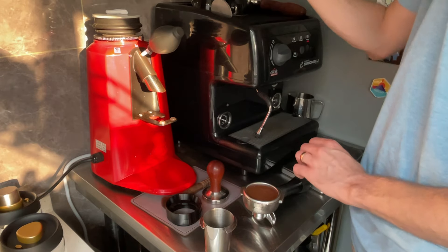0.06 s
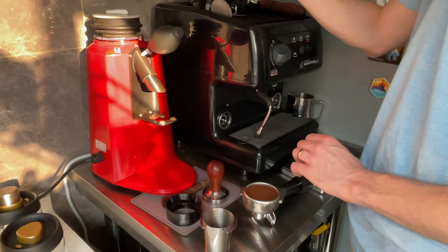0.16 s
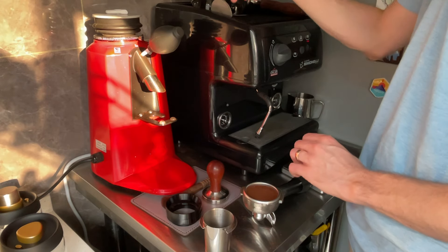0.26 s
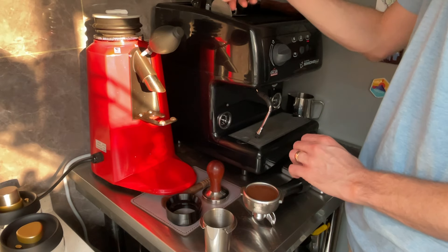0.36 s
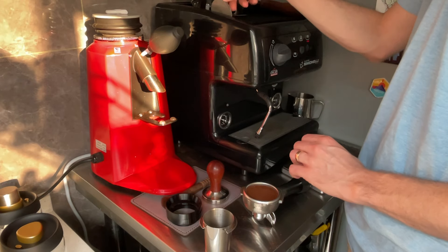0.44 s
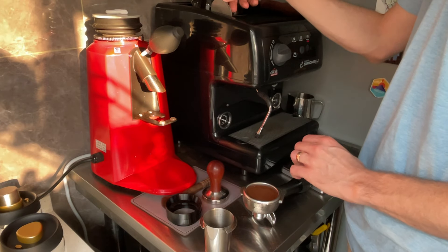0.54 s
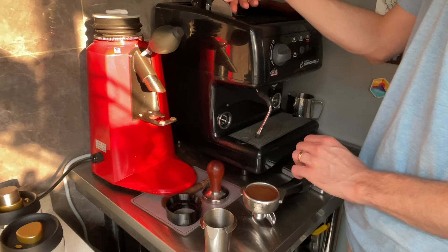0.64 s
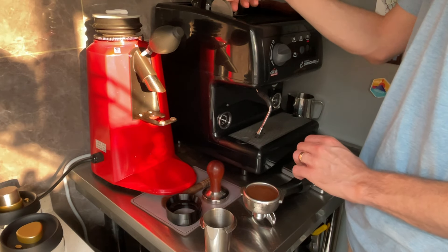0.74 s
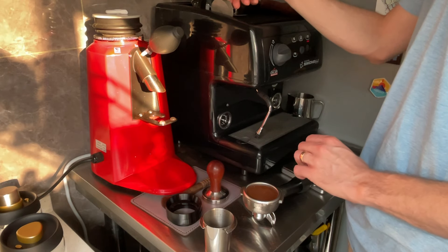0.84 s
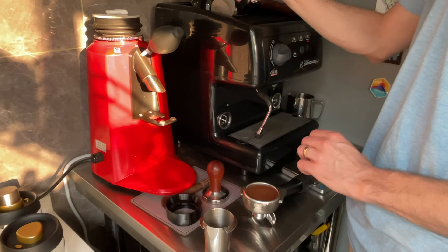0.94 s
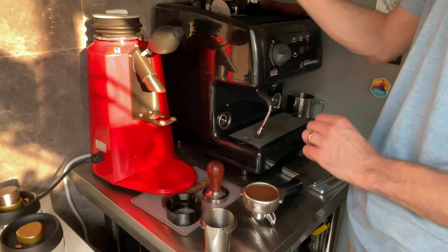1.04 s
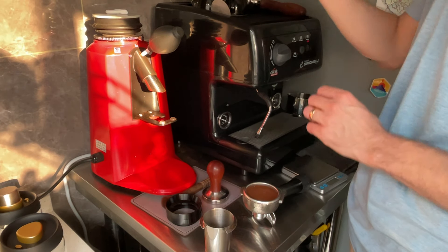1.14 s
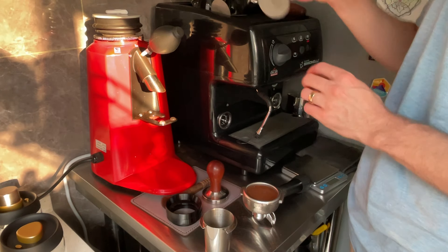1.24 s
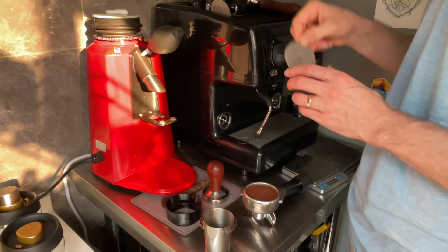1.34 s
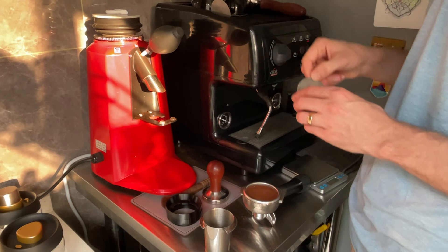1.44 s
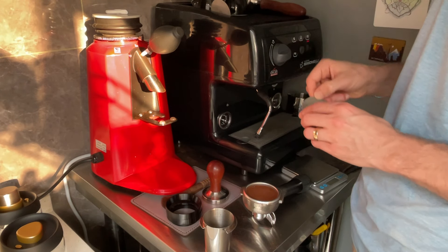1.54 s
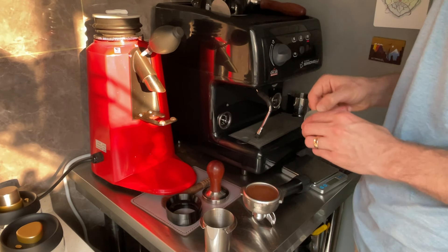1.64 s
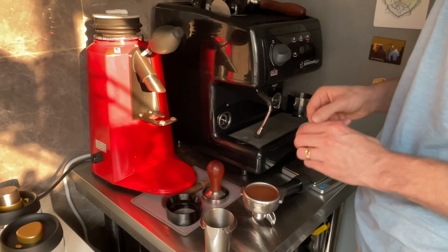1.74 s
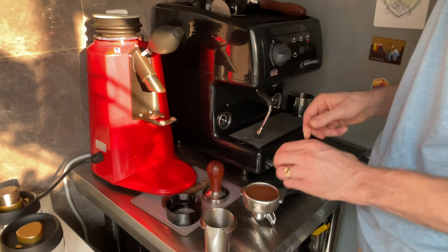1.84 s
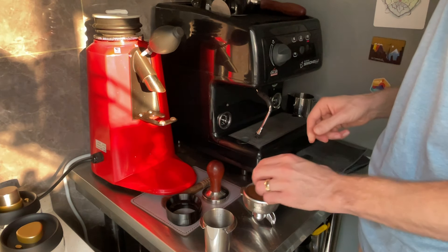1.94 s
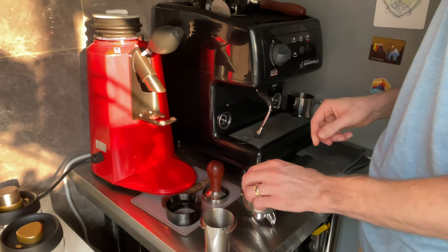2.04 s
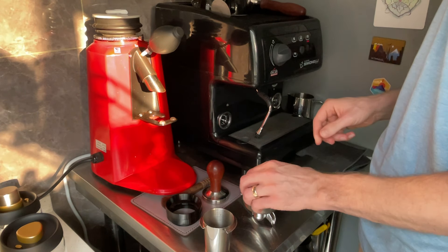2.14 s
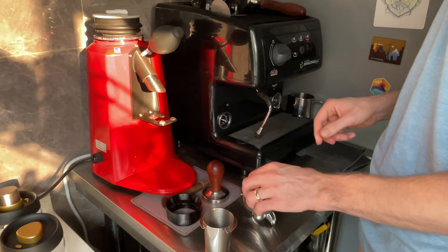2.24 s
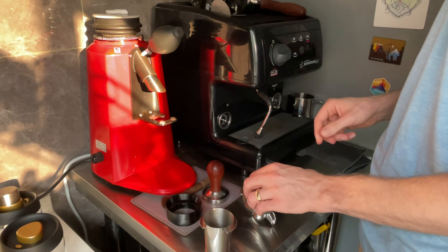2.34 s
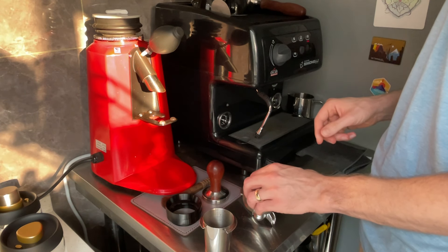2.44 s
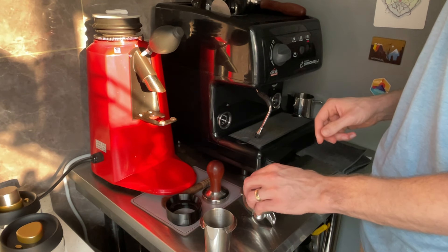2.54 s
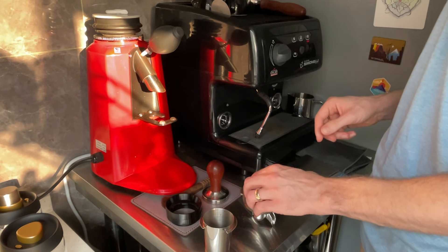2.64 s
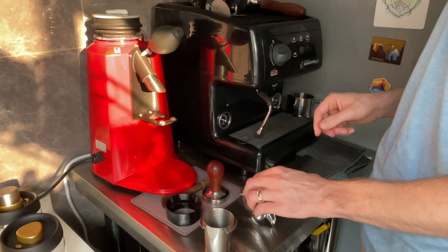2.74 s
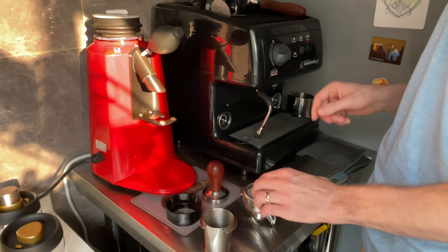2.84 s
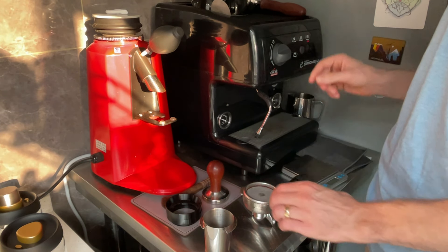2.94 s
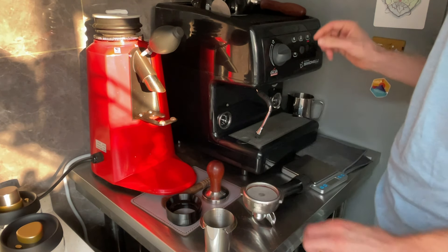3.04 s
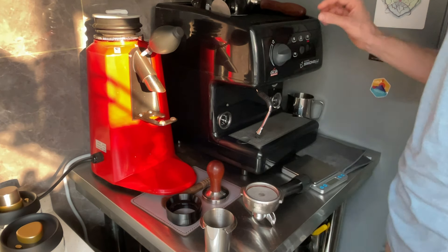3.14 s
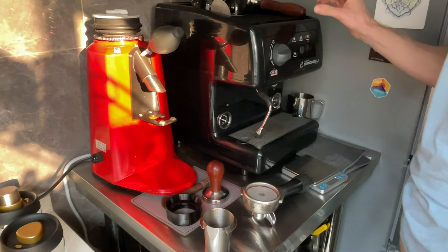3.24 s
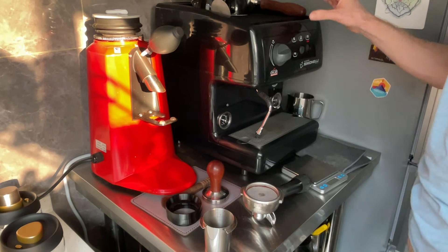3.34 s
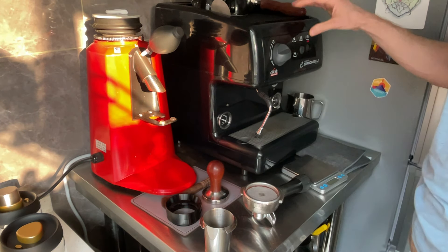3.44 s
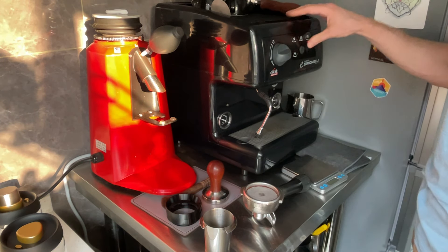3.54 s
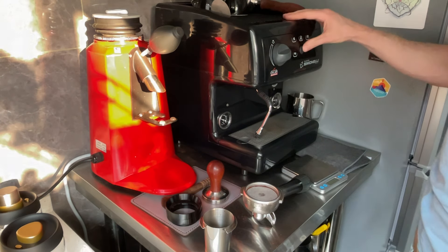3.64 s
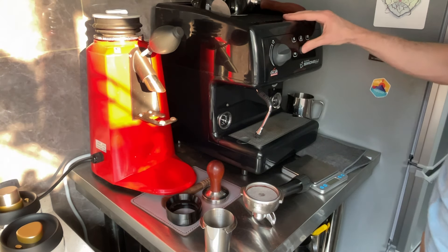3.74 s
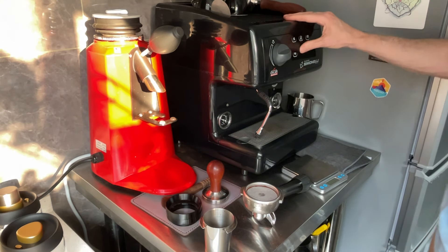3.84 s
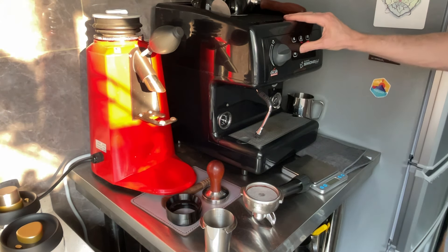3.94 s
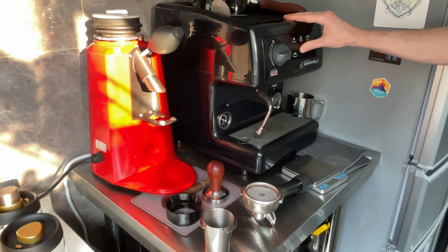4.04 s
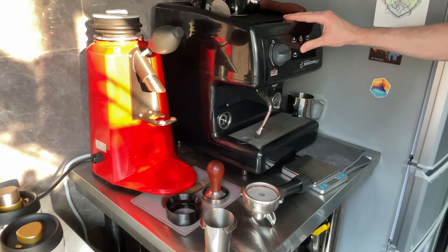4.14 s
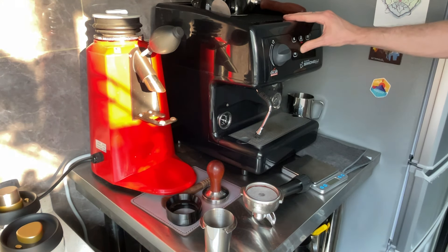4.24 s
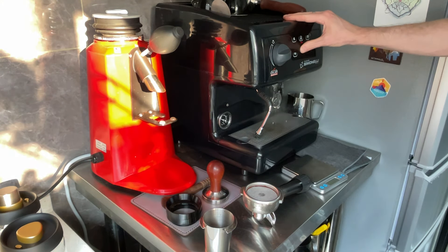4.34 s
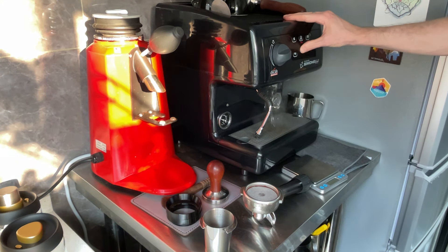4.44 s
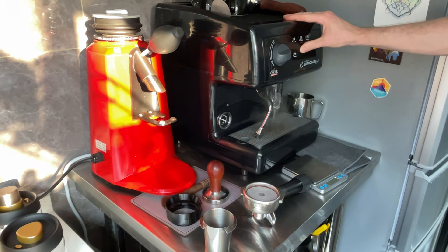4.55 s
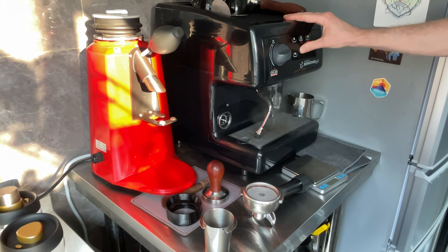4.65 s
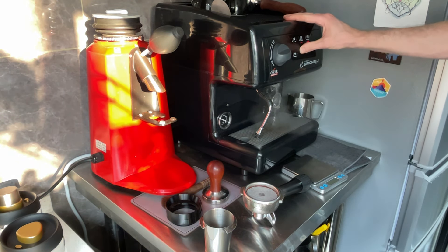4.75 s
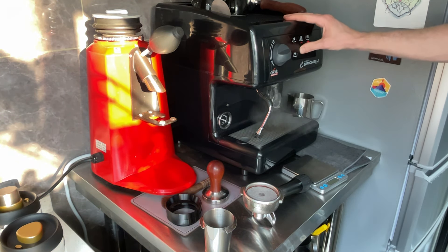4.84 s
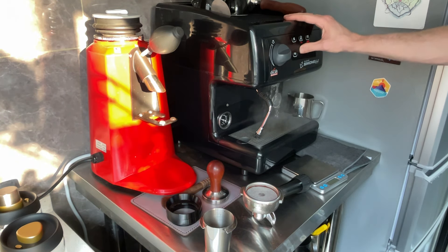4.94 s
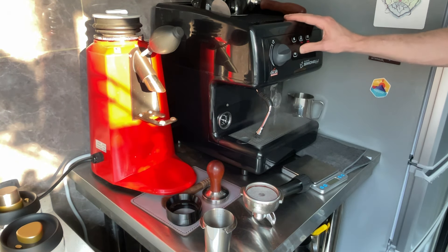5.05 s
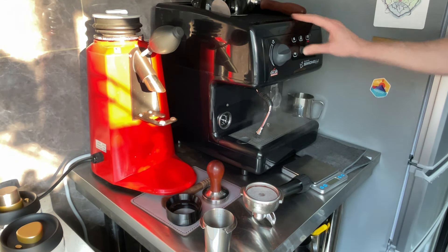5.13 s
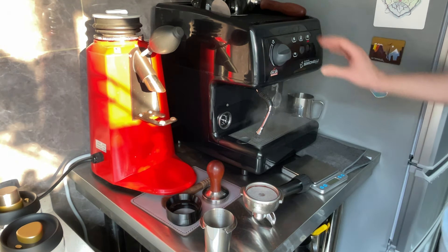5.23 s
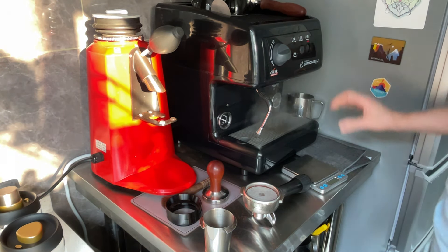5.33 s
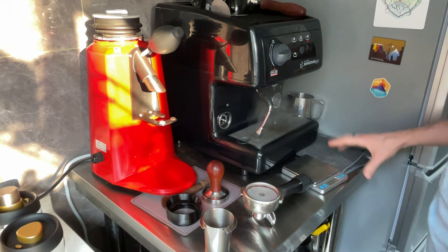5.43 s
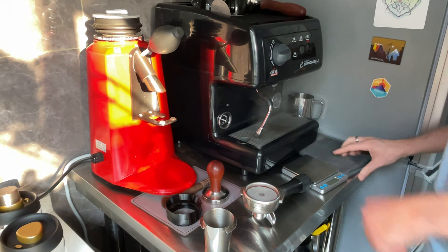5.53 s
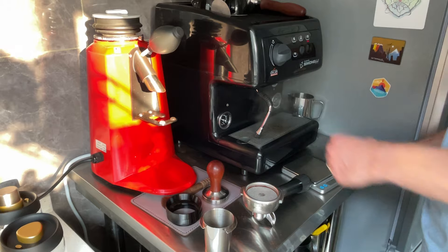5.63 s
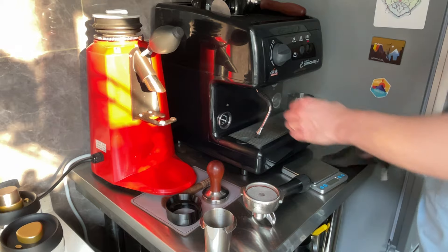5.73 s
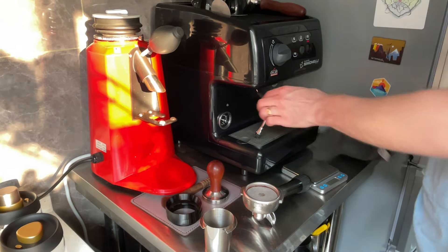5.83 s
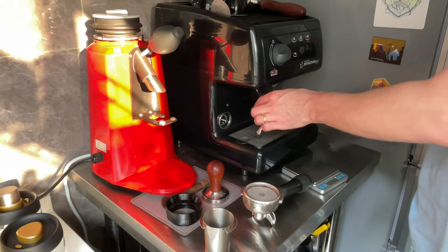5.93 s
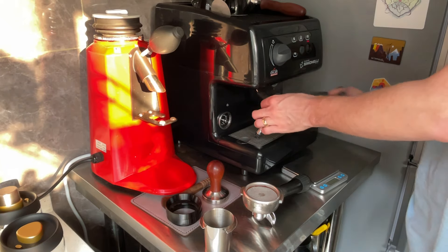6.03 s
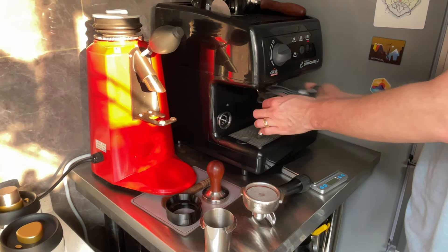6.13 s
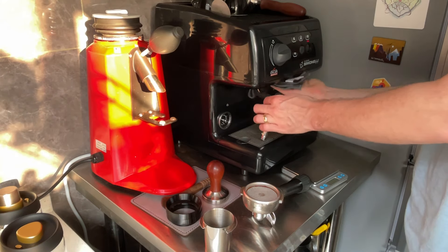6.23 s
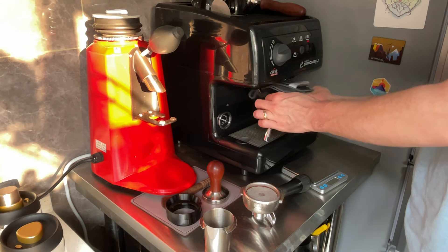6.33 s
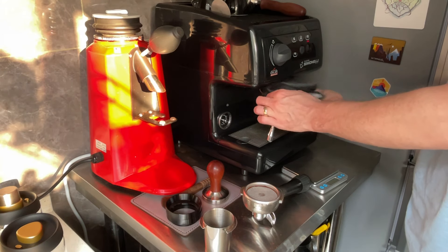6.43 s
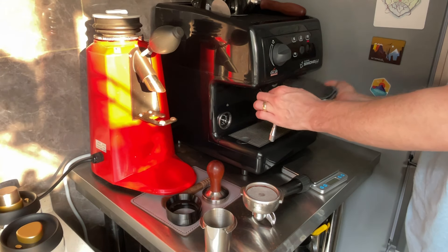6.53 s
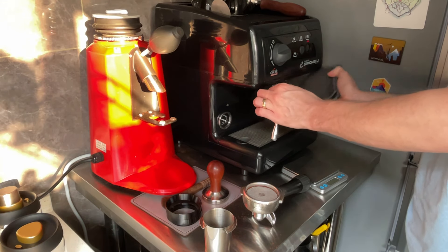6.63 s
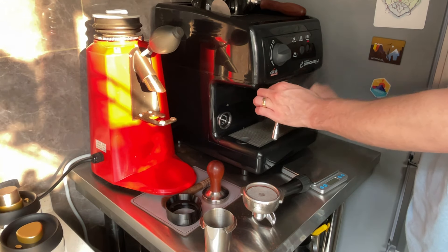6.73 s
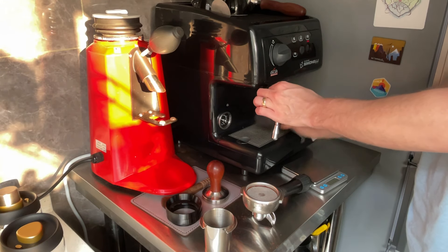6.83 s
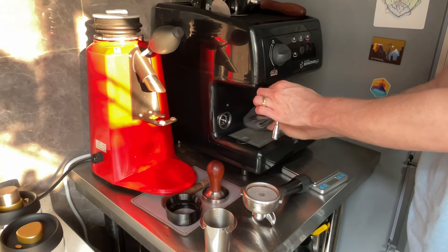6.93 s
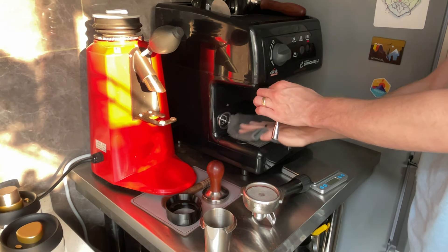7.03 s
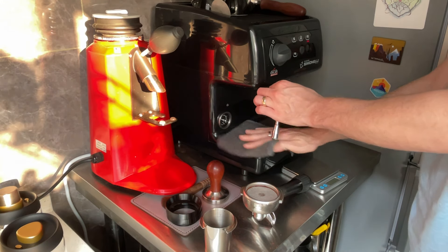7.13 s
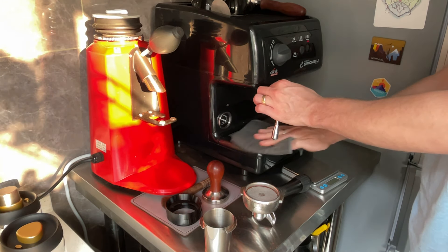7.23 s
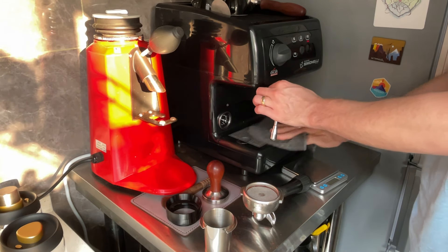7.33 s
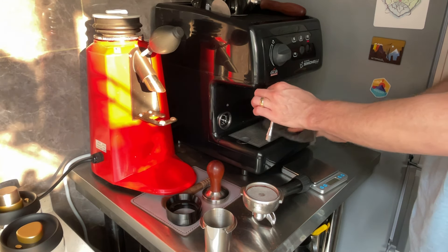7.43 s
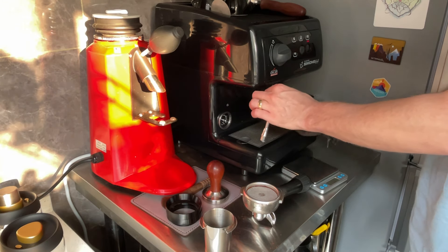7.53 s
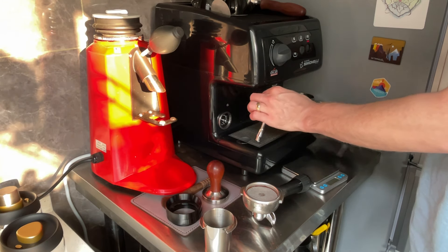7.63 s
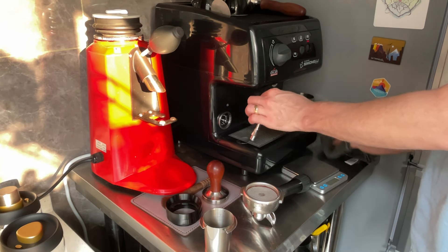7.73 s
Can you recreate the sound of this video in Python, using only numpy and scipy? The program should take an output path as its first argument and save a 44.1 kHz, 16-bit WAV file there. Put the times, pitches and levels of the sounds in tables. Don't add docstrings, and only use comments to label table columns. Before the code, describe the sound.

Close stereo pickup in a small kitchen: a metal disc touches down, a part drags in little stuttering slips, and a cluster of knocks rings on steel. A quieter pause with light taps and rustling follows. Then a sharp metallic clack, a brief coarse mains-rate pump buzz with water hiss, and a sharp clunk off. Dry cloth friction and small tray knocks finish over very low refrigerator hum.

```python
import sys
import numpy as np
from scipy import signal
from scipy.fft import rfft, irfft, next_fast_len
from scipy.io import wavfile

SR = 44100
rng = np.random.default_rng(int(sys.argv[2]) if len(sys.argv) > 2 else 0)


def volts(x):
    e = np.asarray(x, float) / 20
    return 10 ** e


def store_pcm(level_fs):
    pcm = np.round(np.clip(level_fs, -1, 1) * 32767).astype(np.int16)
    wavfile.write(sys.argv[1], SR, np.atleast_2d(pcm).T)


N = 343098
SIZE = next_fast_len(N + SR)
HZ = np.maximum(np.arange(SIZE // 2 + 1) * SR / SIZE, 1)
TIME = np.arange(N) / SR

MAINS_HZ = 50.03
PUMP_ON_S, PUMP_OFF_S = 3.92, 5.124
TREND_MIDDLE_S = 4.58

# f/Hz, level/dB per Hz
VALVE_CRACK = [(200, -22), (620, -28), (1080, -7), (1650, -6.5), (2130, -9.5), (2800, -0.5), (4600, -10.5),
               (6500, -9.5), (7700, -15.5), (10900, -4), (13000, -8.5), (14300, -22), (15700, -21),
               (16300, -40.5)]
TOP_CRACK = [(120, -52), (200, -32.5), (450, -20), (658, -1), (939, 3.5), (1100, 6.5), (1660, -29),
             (1880, 5.5), (4030, -5), (7650, -40.5), (11500, -31), (14000, -64)]
# f/Hz, level/dB, t60/s
VALVE_MODES = [(785, -4.5, 0.08), (1108, -5.5, 0.24), (1440, -16.5, 0.0044), (1617, -6.5, 0.026),
               (1890, -5, 0.052), (2430, -8, 0.056), (2620, -11, 0.037), (4330, -8, 0.041),
               (5160, -20.5, 0.01), (9500, -11, 0.019), (11010, -11.5, 0.026), (12800, -15.5, 0.0091)]
TOP_MODES = [(694, -2, 0.045), (807, -5.5, 0.04), (1120, 2.5, .04), (1200, -2, 0.04), (1308, -3, 0.029),
             (1951, -2.5, 0.026), (2290, -12, 0.023), (2980, -13, .03), (4100, -16, 0.037)]


def rms_one(x):
    return x / np.sqrt(np.mean(x ** 2) + 1e-20)


def at_hz(points, hz=HZ):
    f, value = np.array(points)[:, 0], np.array(points)[:, 1]
    return np.interp(np.log(hz), np.log(np.maximum(f, 1)), value)


def shaped(x, response):
    return irfft(rfft(x, SIZE) * response, SIZE)[..., :N]


def drift(rate):
    knots = rng.standard_normal(400)
    return np.interp(TIME * rate, np.arange(400), knots) * 1.2


def coloured(spectrum, patchy_db, rate, grain_db=0.):
    grains = np.repeat(rng.exponential(1, N // 64 + 1), 64)[:N]
    white = rng.standard_normal(N) * volts(grain_db * grains)
    whole = rfft(white, SIZE) * volts(at_hz(spectrum))
    out, together = 0, drift(rate)
    lowest, highest = np.log2(spectrum[0][0]), np.log2(spectrum[-1][0])
    band_octaves = .7
    for centre in np.arange(lowest, highest + band_octaves, band_octaves):
        share = np.clip(1 - abs(np.log2(HZ) - centre) / band_octaves, 0, 1)
        flicker_db = patchy_db * (0.27 * together + drift(3 * rate))
        out = out + irfft(whole * share, SIZE)[:N] * volts(flicker_db)
    return rms_one(out)


def ring(x, hz, t60):
    radius, angle = volts(-60 / (max(t60, .004) * SR)), 2 * np.pi * hz / SR
    return signal.lfilter([0, np.sin(angle)], [1, -2 * radius * np.cos(angle), radius ** 2], x + 1e-18)


def contact(seconds):
    age = np.arange(3072) / SR
    swell = 1 - np.exp(-age / .0008)
    clicks = rng.standard_normal(3072) * rng.exponential(1, 3072)
    chatter = clicks * np.exp(-age / max(seconds, .001)) * swell
    return chatter / np.linalg.norm(chatter)


def add(out, s, sound):
    at = round(s * SR)
    out[at:at + len(sound)] += sound[:N - at]


def struck(hits, modes, crack, longest, hard_hz):
    out = np.zeros(N)
    colour = volts(at_hz(crack, np.arange(1, 4098) * SR / 8192))
    crack_pulse = np.fft.fftshift(irfft(colour))[4096 - 40:4096 + 200]
    soft = signal.butter(4, hard_hz, fs=SR, output="sos")
    for s, db, seconds, crack_db in hits:
        blow = np.pad(contact(seconds), (0, 5120))
        body = 0
        for hz, level_db, t60 in modes:
            strength_db = level_db + 2.5 * rng.normal()
            body = body + volts(strength_db) * ring(blow, hz, min(t60, longest))
        dense = signal.fftconvolve(blow, crack_pulse)[40:8192 + 40]
        both = body / abs(body).max() + volts(crack_db) * dense / abs(dense).max()
        add(out, s, volts(db - 4.5) * signal.sosfilt(soft, both))
    return out


def stroke(start, swell, fade, db, end=None):
    end = start if end is None else end
    rise_db = 20 * np.maximum(start - TIME, 0) / max(swell, .003)
    fall_db = 20 * np.maximum(TIME - end, 0) / max(fade, .003)
    return volts(db - rise_db - fall_db)


def room_tone():
    # f/Hz, level/dB per Hz
    air = [(15, -36), (25, -11.5), (64, -13), (101, 2.5), (125, -17.5), (154, -8), (191, -13.5), (415, -23),
           (637, -24.5), (749, -22.5), (1090, -22.5), (1580, -34.5), (2180, -34), (3830, -53), (15000, -73)]
    # f/Hz, width/Hz, level/dB
    fridge = [(100, 12, -58), (150, 9.3, -69), (45.6, 12, -58), (414, 51, -64.5)]
    compressor = 0
    for hz, width, db in fridge:
        compressor = compressor + volts(db) * rms_one(ring(rng.standard_normal(N), hz, 2.7 / width))
    return volts(-53) * coloured(air, patchy_db=-2.0, rate=4.6) + compressor


def hands():
    # peak t/s, swell/s per 20 dB, fade/s per 20 dB, rustle level/dB, sheen re rustle/dB
    reaching = [(0.0, .1, 0.4, -72.5, -13.5), (.47, -0.4, -0.2, -72, -28), (0.95, 0.04, -0.01, -48, -11),
                (1.0, 0, 0.21, -46, -22), (1.31, -1.5, 0, -70, -14), (2.718, 0, .07, -75, 5),
                (3.08, 0.3, 2.5, -73.5, -17.5), (3.18, 0.03, 0.7, -66, -16), (3.3, 0.02, 0.08, -57.5, -9),
                (3.639, 0.08, 0.2, -54.5, -5.5), (3.87, 0.3, 0.5, -56.5, -22), (3.555, 0, -14, -62, -3.5)]
    wiping = [(5.3, 0.054, .3, -65, -4), (5.54, 0.034, 0.4, -63, -5), (5.7, 0.44, .15, -69, -4.5),
              (6.125, .01, 0.081, -67, -9), (6.2, 0.13, .5, -72.5, -11), (6.43, .25, 0.22, -66, -6.5),
              (6.72, 0.32, .06, -73, -3), (6.82, 0.015, 0.11, -55.5, -5.5), (6.98, 0.17, 0.95, -64.5, -2.5),
              (7.42, 0.75, .1, -64.5, -3), (7.454, 0.0033, 0.033, -42, -3.5), (7.48, 0.019, 0.19, -56, -8),
              (7.77, 0.27, 0.28, -82, 2)]
    # t/s, fade/s per 20 dB, rustle level/dB, sheen re rustle/dB
    jolts = [
        (.795, 0.1, -63.5, -7),
        (.911, 0.04, -65, -14),
        (0.933, 0.09, -51.5, -14.5),
        (0.9857, 0.04, -33.5, -13),
    ]
    # t/s, rub level/dB
    pats = [(.47, -51.5), (.99, -46), (1.31, -53.5), (2.32, -59.5), (2.72, -53), (3.25, -57.5),
            (3.64, -46.5), (3.86, -43.5), (5.31, -52), (5.54, -54), (6.16, -55), (6.3, -53), (6.72, -55.5),
            (6.86, -45), (6.98, -48), (7.46, -46.5)]
    # from t/s, to t/s, rub level/dB
    tray_wipe = (6.82, 7.5, -50)
    # rub, rustle, sheen level/dB
    rest_db = (-59.5, -88, -108)
    # f/Hz, level/dB per Hz
    rub_spectrum = [(60, -15.5), (100, -5.5), (250, 4.5), (600, -5), (1200, -11), (2000, -28.5)]
    rustle_spectrum = [(900, -18), (1600, 7), (3000, 3), (5000, -1.5), (7000, -8), (8500, -12)]
    sheen_spectrum = [(7800, -18.5), (8800, 0), (10500, 1.5), (12500, -1.5), (13800, -5.5), (16000, -11.5)]

    rub, rustle, sheen = volts(np.array(rest_db))
    slips = [(s, .003, fade, db, sheen_db) for s, fade, db, sheen_db in jolts]
    for s, swell, fade, db, sheen_db in reaching + wiping + slips:
        shape = stroke(s, swell, fade, db)
        rustle = np.hypot(rustle, shape)
        sheen = np.hypot(sheen, volts(sheen_db) * shape)
    for s, db in pats:
        rub = np.hypot(rub, stroke(s, 0.051, 0.2, db))
    start, end, db = tray_wipe
    rub = np.hypot(rub, stroke(start, 0.022, 0.27, db, end))
    rub = rub * coloured(rub_spectrum, patchy_db=1.5, rate=8.1)
    rustle = rustle * coloured(rustle_spectrum, patchy_db=1.2, rate=8.0, grain_db=.8)
    sheen = sheen * coloured(sheen_spectrum, patchy_db=1.2, rate=9.0, grain_db=1.6)
    return rub + rustle + sheen


def disc_touch():
    # t/s, peak level/dB, contact/s, crack level/dB
    touches = [
        (0.47, -41.5, 0.006, -7),
        (.481, -41.5, .015, -8),
        (0.499, -47, 0.014, -12),
    ]
    # f/Hz, level/dB, t60/s
    disc_modes = [(1350, 8.5, 0.028), (2000, -6, .03), (2830, -2, 0.037), (3060, -9, 0.02),
                  (4100, -8, 0.025), (4280, -9, .02)]
    return struck(touches, disc_modes, TOP_CRACK, longest=.05, hard_hz=5600)


def top_drag():
    # t/s, peak level/dB
    slips = [
        (0.618, -40.5),
        (.632, -36.5),
        (0.648, -41),
        (0.664, -39.5),
        (.682, -43),
        (0.7, -39),
        (0.731, -47),
        (0.758, -40),
    ]
    # f/Hz, level/dB, t60/s
    drag_modes = [(660, -6, .05), (750, -4, .05), (1100, 0, .06), (1200, -3, 0.055), (1270, -9, .045),
                  (1960, -15, .05)]
    blows = [(s, db, .03, -9) for s, db in slips]   # contact/s, crack level/dB
    return struck(blows, drag_modes, TOP_CRACK, longest=.1, hard_hz=2300)


def part_click():
    # t/s, peak level/dB, contact/s, crack level/dB
    clicks = [
        (.794, -43.5, 0.0068, 3),
        (.803, -47, 0.0065, 1),
    ]
    # f/Hz, level/dB, t60/s
    click_modes = [(1890, -6, .03), (2490, -1, 0.035), (3060, -4, .04), (4430, -10, .03), (4860, -7, .015),
                   (5370, -17, 0.027)]
    return struck(clicks, click_modes, VALVE_CRACK, longest=.02, hard_hz=6500)


def top_blows():
    # t/s, peak level/dB, contact/s, crack level/dB
    blows = [(0.91, -35, 0.0099, -12), (.924, -33.5, 0.018, -4), (0.938, -31.5, 0.017, -1),
             (0.951, -31.5, 0.02, -6), (.966, -33, 0.022, -9), (0.985, -25.5, 0.0052, -2),
             (0.991, -21.5, 0.0062, -4), (.999, -23, 0.013, -4), (1.012, -34, .025, -10),
             (1.029, -40, 0.02, -8), (1.059, -34, 0.033, -4), (1.3005, -41.5, 0.0035, -4)]
    return struck(blows, TOP_MODES, TOP_CRACK, longest=.05, hard_hz=6000)


def knocks():
    # t/s, peak level/dB, low ring f/Hz, high part level/dB, crack level/dB
    small_parts = [(2.71, -43, 910, -18, -29.5), (2.741, -49, 470, -17, -35), (3.169, -40.5, 810, -27, -30),
                   (3.2, -52, 750, -17, -29), (5.131, -34.5, 770, 7.5, -8), (5.449, -45, 870, -15, -24),
                   (5.467, -44, 586, -16, -18), (5.481, -57, 837, -20, -12.5), (5.534, -59, 506, 5, -9),
                   (6.119, -66, 626, -9, -15.5), (6.226, -45, 945, -31.5, -34.5),
                   (6.815, -37, 900, -4.5, -13), (6.829, -36.5, 838, -23, -30), (6.841, -36, 470, -14, -30),
                   (6.885, -34.5, 1020, -17, -30), (6.892, -38, 642, -18, -37), (6.905, -56, 890, -12, -35),
                   (6.948, -43, 807, -8, -27.5), (6.984, -46, 870, -1, -19), (7.038, -45, 674, -11, -35),
                   (7.073, -47, 870, -3, -26), (7.166, -45, 690, -16, -26), (7.177, -41.5, 1010, -12, -30),
                   (7.251, -46, 520, -19, -26.5), (7.452, -30, 950, -16, -30.5), (7.479, -38, 890, -8, -27),
                   (7.683, -53.5, 670, -20.5, -37)]
    # t/s, peak level/dB, f/Hz
    thuds = [(2.72, -54, 305), (6.24, -40, 253), (5.127, -24, 213.6), (5.135, -26.5, 100),
             (6.821, -43, 270), (6.889, -59, 336), (7.001, -44.5, 150), (7.288, -37.5, 132),
             (7.312, -39.5, 120.4), (1.298, -48, 790), (2.666, -43, 100), (3.203, -48, 150),
             (7.118, -46, 202), (7.458, -36, 269), (7.489, -34, 100)]
    high_hz, t60_s = 2016, 0.067
    bottom = signal.butter(4, [500, 1800], "band", fs=SR, output="sos")
    middle = signal.butter(2, [1500, 5000], "band", fs=SR, output="sos")
    top = signal.butter(2, 5000, "high", fs=SR, output="sos")
    out = np.zeros(N)
    for s, db, low_hz, high_db, crack_db in small_parts:
        blow = np.pad(contact(.005), (0, 5000))
        low = rms_one(ring(blow, low_hz, t60_s)) + 0.7 * rms_one(signal.sosfilt(bottom, blow))
        high = 1.1 * rms_one(ring(blow, high_hz, 0.23 * t60_s)) + rms_one(signal.sosfilt(middle, blow))
        crack = signal.sosfilt(top, blow)
        for part, part_db in ((low, 0), (high, high_db), (crack, crack_db)):
            add(out, s, volts(db + part_db) * part / abs(part).max())
    for s, db, hz in thuds:
        thud = ring(np.pad(contact(0.003), (0, 8000)), hz, 0.1)
        thud = ring(thud, 1.1 * hz, 0.0071)
        add(out, s, volts(db) * thud / abs(thud).max())
    return out


def disc_press():
    # t/s, peak level/dB, contact/s, crack level/dB
    presses = [
        (2.664, -52, 0.012, -30),
        (2.676, -54, .012, -30),
        (2.714, -56, 0.006, -30),
    ]
    # f/Hz, level/dB, t60/s
    press_modes = [(1888, -3, 0.14), (4480, -14, 0.054)]
    return struck(presses, press_modes, TOP_CRACK, longest=.12, hard_hz=4000)


def finger_touch():
    # t/s, peak level/dB
    touches = [
        (3.822, -37),
        (3.848, -39),
        (3.868, -38),
    ]
    blows = [(s, db, .03, -9) for s, db in touches]   # contact/s, crack level/dB
    return struck(blows, TOP_MODES, TOP_CRACK, longest=.05, hard_hz=1150)


def switch_on():
    # t/s, peak level/dB, contact/s, crack level/dB
    clacks = [
        (3.883, -18, 0.033, 5),
        (3.8947, -13, 0.0039, 13),
        (3.8985, -11.5, 0.002, 9),
        (3.902, -12.5, 0.0036, 12.5),
        (3.906, -10, 0.0035, 8),
    ]
    return struck(clacks, VALVE_MODES, VALVE_CRACK, longest=.07, hard_hz=18000)


def snaps():
    # t/s, peak level/dB
    bright_snaps = [(3.884, -43), (3.897, -13.5), (5.1188, -25), (5.362, -49), (5.412, -57), (5.467, -56.5),
                    (5.482, -60), (5.535, -53.5), (6.122, -65), (6.815, -47), (6.985, -51), (7.177, -66),
                    (7.453, -39.5)]
    above = signal.butter(2, 4000, "high", fs=SR, output="sos")
    below = signal.butter(2, 15000, fs=SR, output="sos")
    bright = np.vstack([above, below])
    out = np.zeros(N)
    for s, db in bright_snaps:
        snap = signal.sosfilt(bright, contact(.0068))
        add(out, s, volts(db) * snap / abs(snap).max())
    return out


def running(steady_db, sag, start_db, settle_s, kick_db):
    since, after = np.maximum(TIME - PUMP_ON_S, 0), TIME - PUMP_OFF_S
    settling_db = start_db * np.exp(-since / settle_s)
    spit_db = kick_db * np.exp(-abs(after) / .0068)
    release_db = 107 * np.maximum(after, 0)
    return (TIME > PUMP_ON_S) * volts(steady_db - sag * since + settling_db + spit_db - release_db)


def loading():
    load_s, rise_s, unloaded_db = 4.028, .008, -10.5
    return volts(unloaded_db / (1 + np.exp(np.clip((TIME - load_s) / rise_s, -30, 30))))


def hum():
    # multiple of mains, left level/dB, right level/dB, left lead/rad, trend/dB per s
    harmonics = [(1.993, -39, -39.5, .23, 1), (2.998, -34.5, -39, -0.1, 4), (4, -43.5, -37, -0.2, -1),
                 (4.98, -41, -37.5, 0.03, -6.5), (5.966, -43, -38.5, -0.2, 13), (7.94, -47, -47, .82, -4.5),
                 (9.01, -37, -39.5, 0.3, 0), (10, -42, -46.5, 1.5, 9), (11.94, -40.5, -45, 0.7, -12),
                 (13, -30.5, -43, 1, -5), (13.87, -35.5, -43, -2.5, 0.7), (14.87, -40, -47.5, 0, -10),
                 (16.13, -47, -46, 1.4, .3), (20.05, -48, -49, -0.4, -6), (22, -46, -43.5, 0.3, -2.1),
                 (23.97, -42, -48, .96, 1.1)]
    out, turn = 0, 2 * np.pi * MAINS_HZ * TIME
    ahead = np.clip(TIME - TREND_MIDDLE_S, -.6, .3)
    for order, left_db, right_db, lead, trend in harmonics:
        waver = drift(14) * .002 * order ** 2 + rng.uniform(0, 7)
        level = volts(trend * ahead + .16 * order * drift(16))
        port_levels, leads = volts(np.array([[left_db], [right_db]])), np.array([[lead], [0]])
        out = out + level * port_levels * np.sin(order * turn + waver + leads)
    return out * running(steady_db=0.24, sag=0.7, start_db=-2.5, settle_s=0.02, kick_db=-12) * loading()


def flush():
    # f/Hz, width/Hz, level/dB, trend/dB per s
    casing = [(478, 34, -1.5, -2), (658, 25, 4, -1.5), (785, 40, -4.5, -6), (987, 49, -6.5, -1),
              (1117, 63, -9.5, -1), (1235, 90, -2, -1), (1544, 15, -4, 1), (1558, 81, -8.5, 1),
              (1828, 40, -10, -2), (1890, 95, -0.1, -0.5), (2147, 55, -1.5, -1), (2584, 70, -5.5, 1),
              (2834, 59.9, -4.5, 0.5), (3083, 55, -0.5, 2), (3265, 99, -4.5, 2), (3593, 70, -0.5, 2),
              (3780, 41, -12, 1), (6234, 120, -13, 1)]
    # f/Hz, level/dB per Hz
    water_spectrum = [(50, -50), (85, -40), (120, -26.5), (220, -22), (340, -23), (460, -7), (800, -2.5),
                      (920, -8), (1050, -3), (1300, -3.5), (3700, -10), (6400, -19), (7900, -25),
                      (9100, -21.5), (12000, -25.5), (13300, -32.5), (14200, -56.5), (16000, -64.5)]
    rattle_gain = running(steady_db=-26, sag=1.5, start_db=-0.5, settle_s=0.5, kick_db=1.5)
    water_gain = running(steady_db=-39, sag=-0.5, start_db=6, settle_s=0.2, kick_db=3.5)

    white = rng.standard_normal(N)
    alike = white[(MAINS_HZ * TIME % 1 * SR / MAINS_HZ).astype(int)]
    shake = (white + .25 * alike) * (1 + 0.25 * np.cos(2 * np.pi * MAINS_HZ * TIME))
    ahead = np.clip(TIME - TREND_MIDDLE_S, -1, 1)
    rattle = 0
    for hz, width, db, trend in casing:
        panel = rms_one(ring(shake, hz, np.log(1000) / np.pi / width)) * np.sqrt(width)
        rattle = rattle + volts(db + trend * ahead + 2.0 * drift(6)) * panel

    since = TIME - PUMP_ON_S
    loose = volts(-34.5) * (since > 0) * np.exp(-abs(since) / .25) * rms_one(ring(shake, 1855, .03))

    water = coloured(water_spectrum, patchy_db=1.0, rate=3.5, grain_db=1.0)
    low = shaped(water, 1 / (1 + (HZ / 4500) ** 4))
    body = rattle_gain * (volts(-3) * rms_one(rattle) + volts(-4) * low) + loose
    bass = shaped(body, 1 / (1 + (HZ / 1300) ** 4))
    bass_kept = shaped(bass, 1 / (1 + (78 / HZ) ** 8))
    drain = volts(-14 * np.maximum(TIME - PUMP_OFF_S, 0))
    return body - bass + loading() * bass_kept + water_gain * drain * rms_one(water - low)


def switch_off():
    # t/s, peak level/dB, contact/s, crack level/dB
    release = [
        (5.1185, -11, 0.0025, 1),
        (5.1235, -14.5, 0.0044, -2),
    ]
    recoil = [
        (5.132, -14, 0.0055, -3),
        (5.137, -16, 0.0043, -3),
    ]
    # f/Hz, level/dB, t60/s
    release_modes = [(1250, -13.5, 0.0304), (1870, -3.5, 0.04), (2130, -5, 0.036), (3010, -4.5, 0.027),
                     (4640, -1, 0.013), (5200, -2, 0.013), (6640, -9, .015), (10120, -3.5, 0.018)]
    clack = struck(release, release_modes, VALVE_CRACK, longest=.06, hard_hz=18000)
    return clack + struck(recoil, VALVE_MODES, VALVE_CRACK, longest=.05, hard_hz=2600)


def kitchen(x):
    # f/Hz, t60/s
    decay_times = [(100, 0.55), (500, 0.36), (2000, 0.47), (6000, 0.33), (12000, 0.1)]
    age, tail = np.arange(SR // 2) / SR, 0
    white = rng.standard_normal(SR // 2)
    for low in 60 * 2.0 ** np.arange(8):
        octave = signal.butter(2, [low, 2 * low], "band", fs=SR, output="sos")
        tail = tail + signal.sosfilt(octave, white) * volts(-60 * age / at_hz(decay_times, 0.64 * low))
    tail *= 1 - np.exp(-age / 0.0015)
    return shaped(x, rfft(tail / np.linalg.norm(tail), SIZE))


def ports(mid, side_table, balance_db, direct):
    scatter = rng.standard_normal(8192) * np.exp(-np.arange(8192) / SR / .045)
    scrambled = rfft(scatter / np.linalg.norm(scatter), SIZE)
    turn = 1j * direct + np.sqrt(1 - direct ** 2) * scrambled
    side = shaped(mid, volts(at_hz(side_table)) * turn + np.tanh(balance_db / 12))
    return np.array([mid + side, mid - side])


def scene():
    # f/Hz, level/dB
    near_side = [(60, -26.5), (150, -7), (300, -9.5), (650, 0), (1400, -3), (3000, -3.5), (4400, -4),
                 (5300, 0.5), (6300, 3.5), (7900, 10.5), (9500, -3), (11300, -9.5), (13000, 1), (14500, 15),
                 (15800, 24.5)]
    far_side = [(60, -18), (110, -16), (200, -1.5), (380, -1.5), (700, 2), (1290, 2.5), (2380, 0),
                (4400, 3), (8120, 0.5), (15000, 4)]
    # f/Hz, level/dB
    near_balance = [(60, -4), (110, 2.5), (200, -4), (380, -5), (700, 8), (1290, 1.5), (2380, 0.5),
                    (4400, 0.5), (8120, -1.5), (15000, 4)]
    # f/Hz, share/1
    near_direct = [(60, .8), (150, .1), (250, -.5), (350, -.3), (480, .4), (1150, .4), (1450, -.3),
                   (2300, -.3), (2800, .4), (4200, .45), (5000, -.1), (7000, .1), (8600, .8), (10300, .6),
                   (11300, -.7)]
    far_direct = [(60, 1), (160, .7), (400, .4), (700, .15), (1300, 0.02)]
    # f/Hz, level/dB
    handled_colour = [(20, -26.5), (40, -0.5), (6500, -1), (7900, 1), (9000, -4.5), (13200, -7),
                      (14200, -24.5), (16000, -18.5)]

    parts = disc_touch() + top_drag() + part_click() + top_blows() + knocks() + disc_press() + finger_touch()
    valve = switch_on() + switch_off()
    notch = 1 - .85 / (1 + ((HZ - 7980) / 260) ** 2)
    handled = parts + volts(-2.0) * kitchen(valve + parts) + hands()
    handled = shaped(handled, volts(at_hz(handled_colour)) * notch)
    machine = shaped(valve + flush(), notch)

    balance_db, direct = at_hz(near_balance), at_hz(near_direct)
    near = ports(machine, near_side, balance_db, direct)
    near = near + ports(handled, near_side, .25 * balance_db, direct)
    far = ports(room_tone(), far_side, 0, at_hz(far_direct))
    return near + hum() + far + snaps()


def top_cut(x):
    return signal.sosfilt(signal.butter(12, 16300, fs=SR, output="sos"), x)


def record(dry):
    steady = signal.sosfilt(signal.butter(6, 38, "high", fs=SR, output="sos"), dry)
    rounded = 0.84 * np.tanh(steady / 0.86)
    mix = signal.sosfilt(signal.cheby2(10, 60, 16400, fs=SR, output="sos"), rounded)
    return top_cut(mix)


dry = scene()
out = record(dry)
store_pcm(out)
```